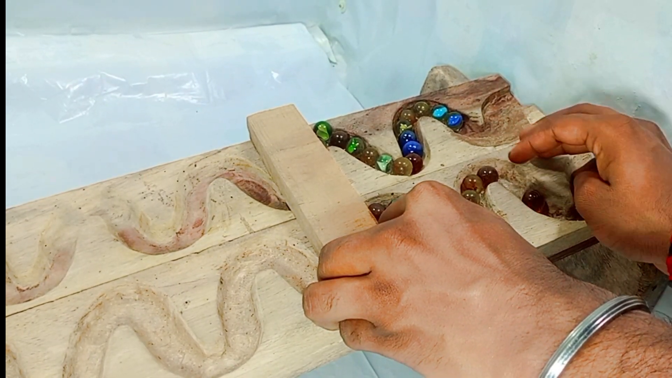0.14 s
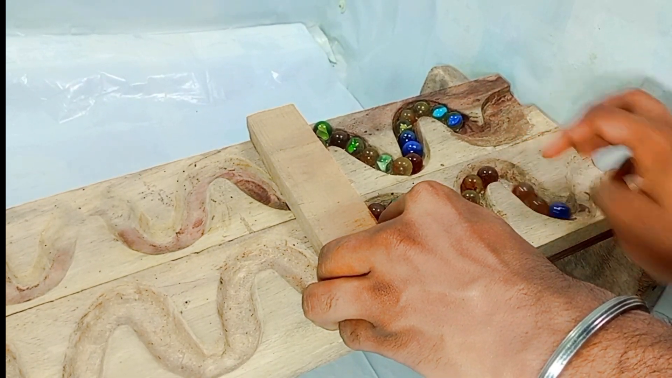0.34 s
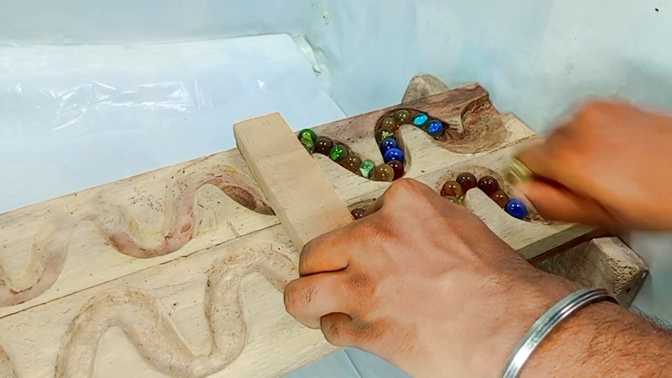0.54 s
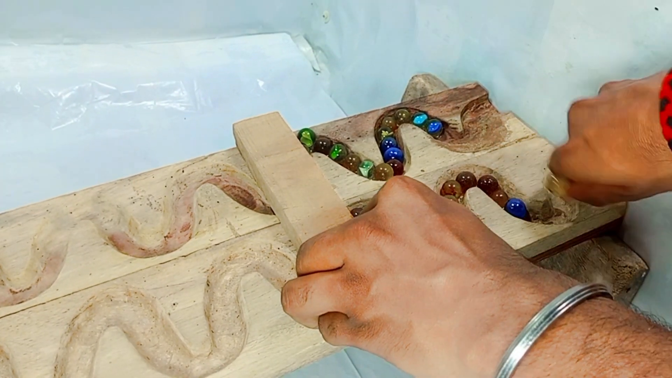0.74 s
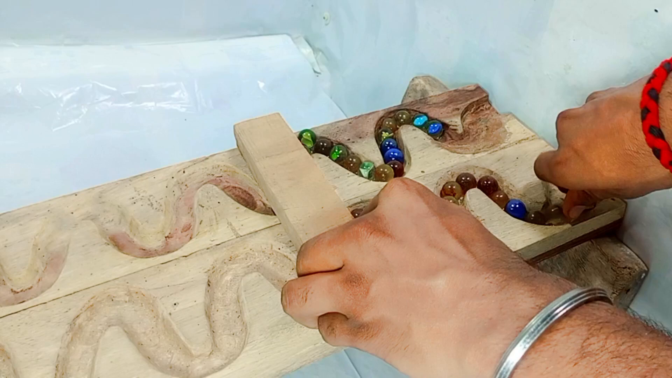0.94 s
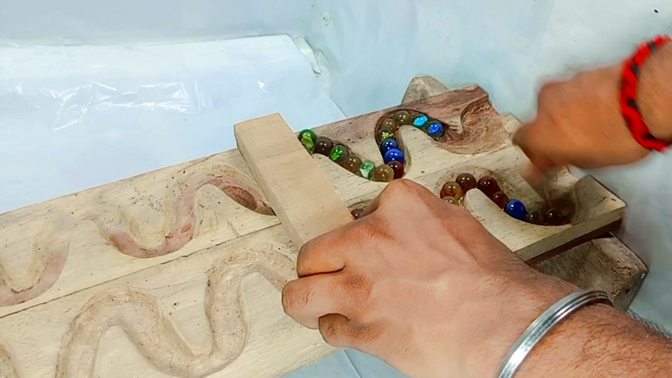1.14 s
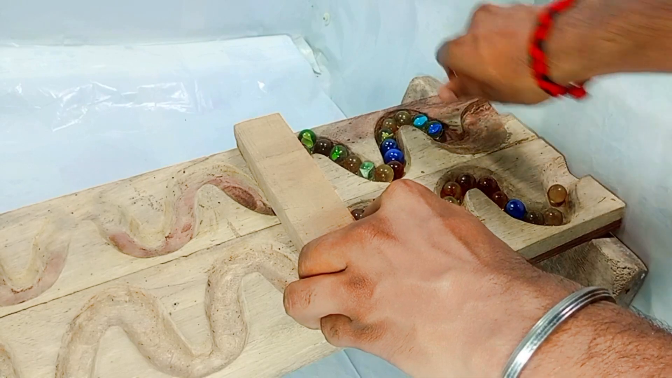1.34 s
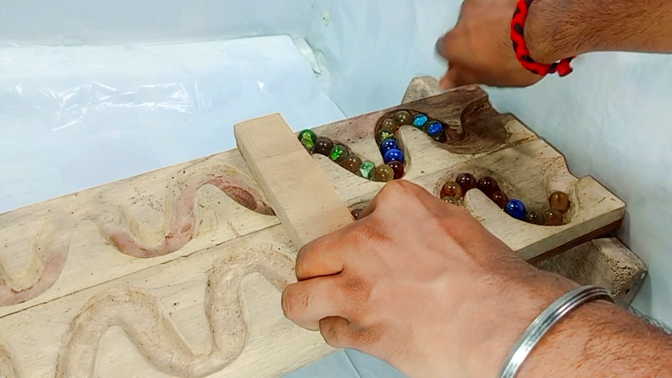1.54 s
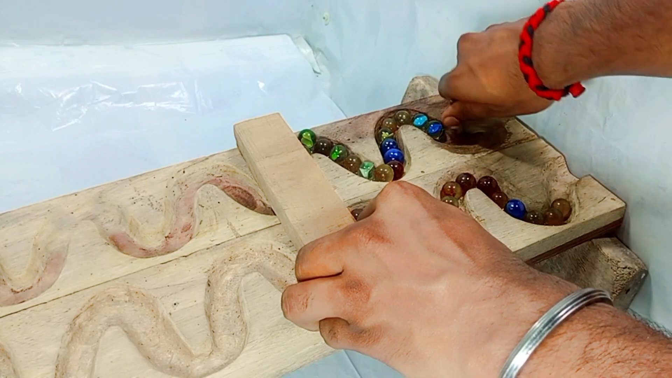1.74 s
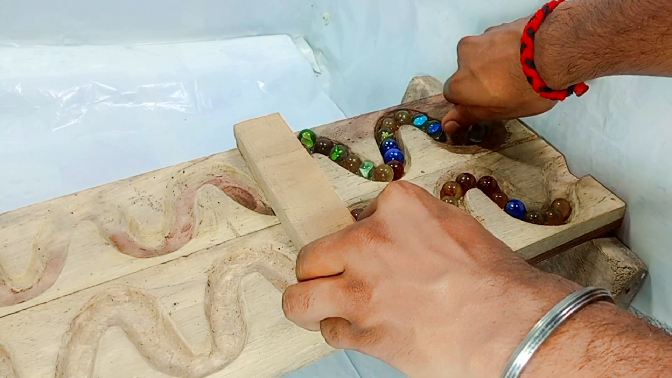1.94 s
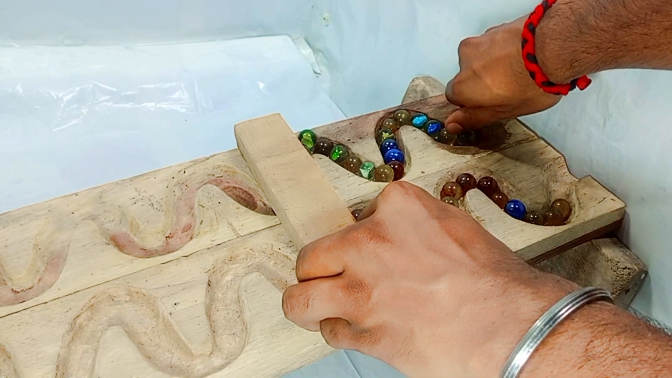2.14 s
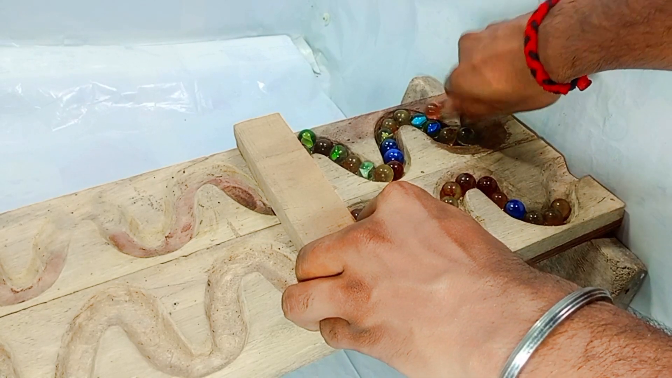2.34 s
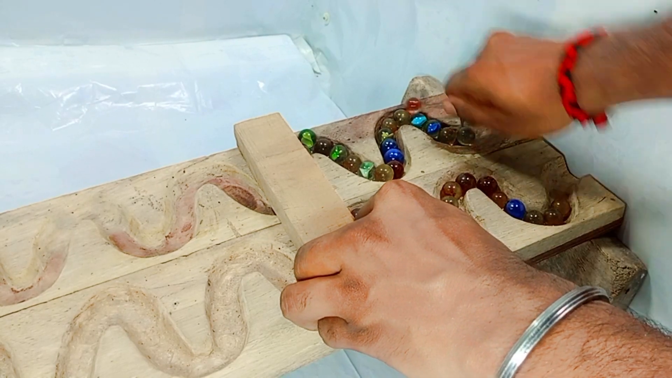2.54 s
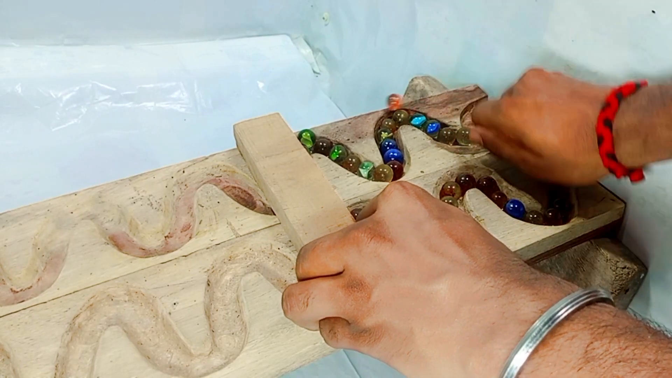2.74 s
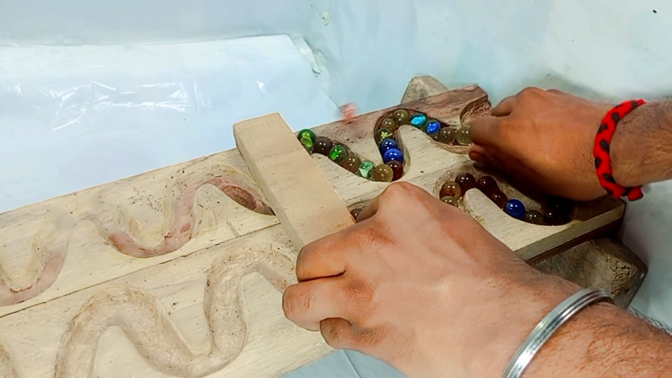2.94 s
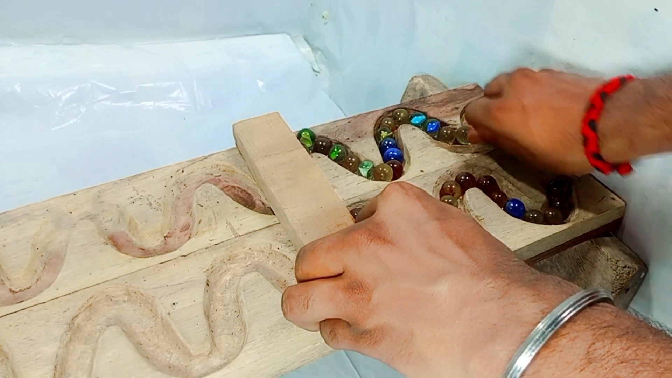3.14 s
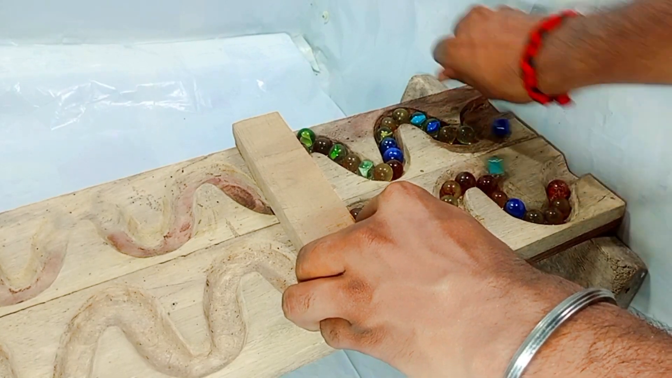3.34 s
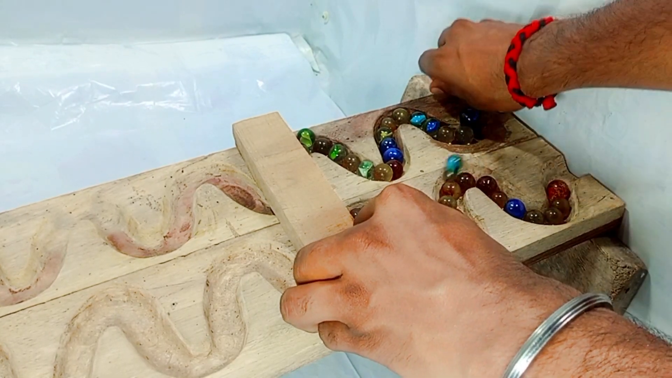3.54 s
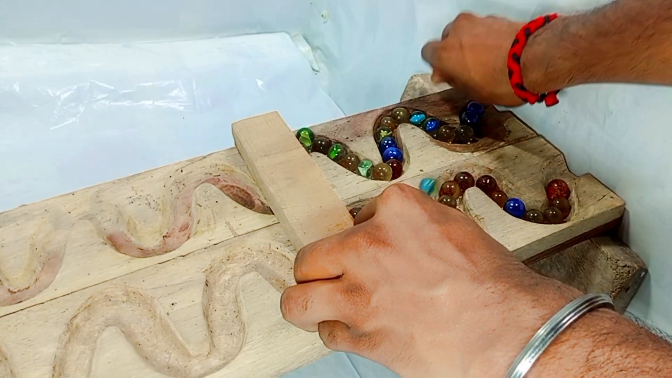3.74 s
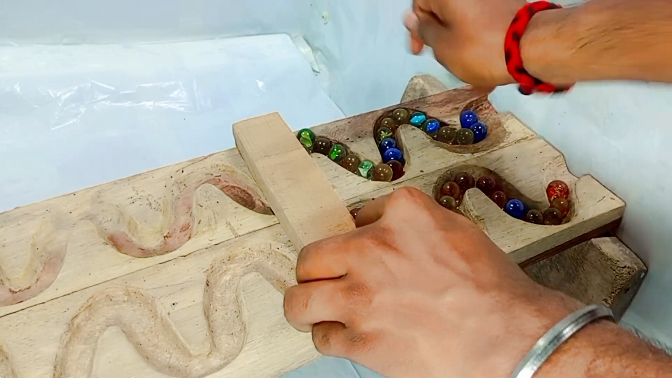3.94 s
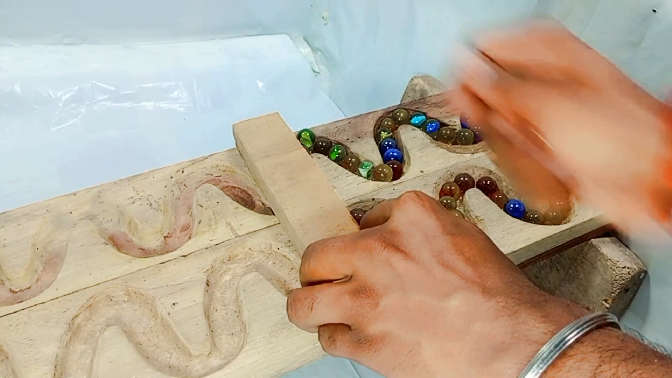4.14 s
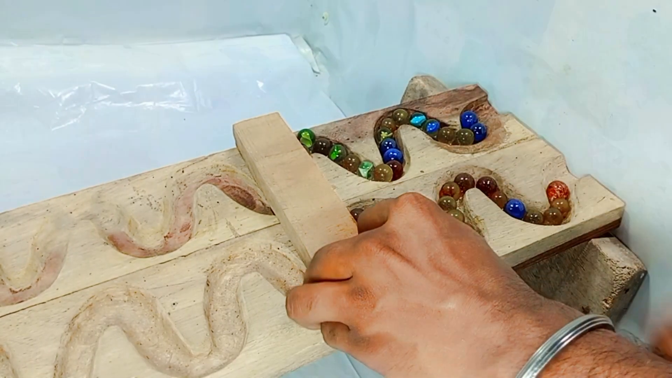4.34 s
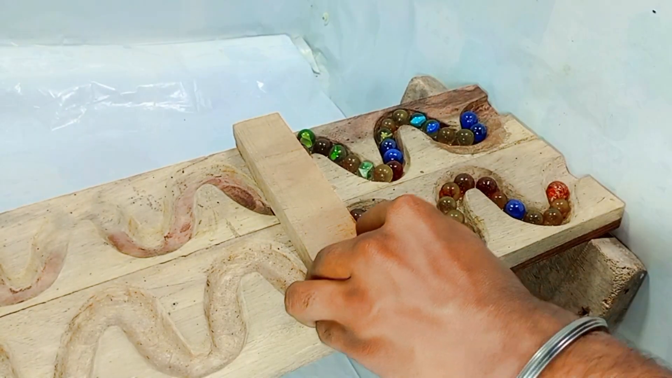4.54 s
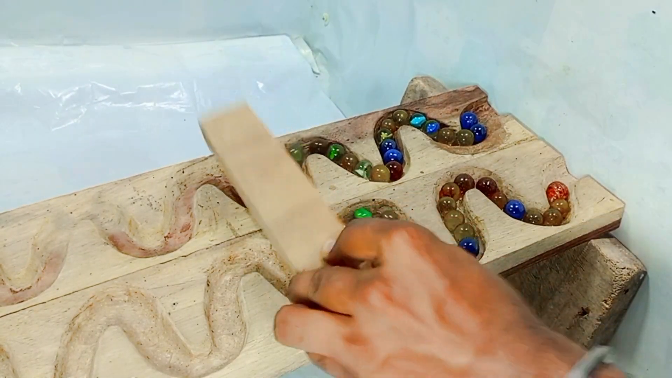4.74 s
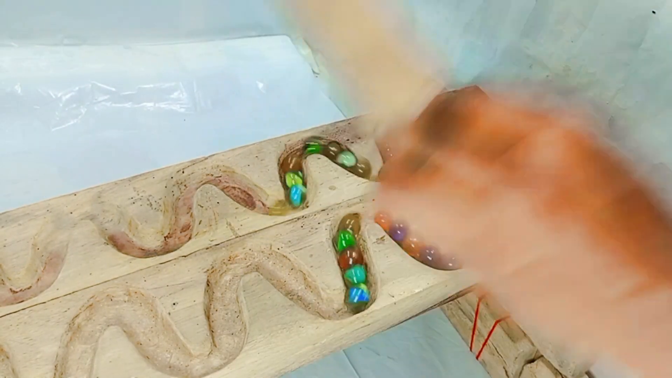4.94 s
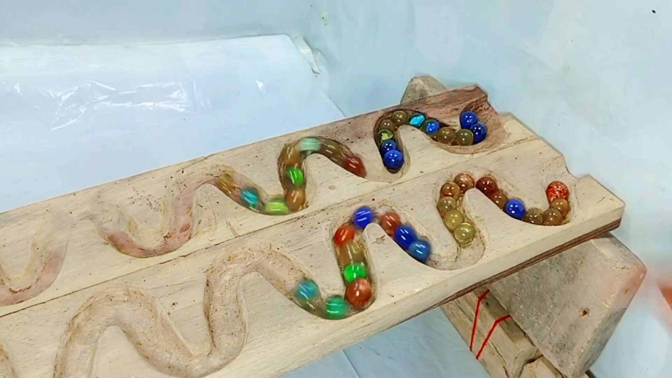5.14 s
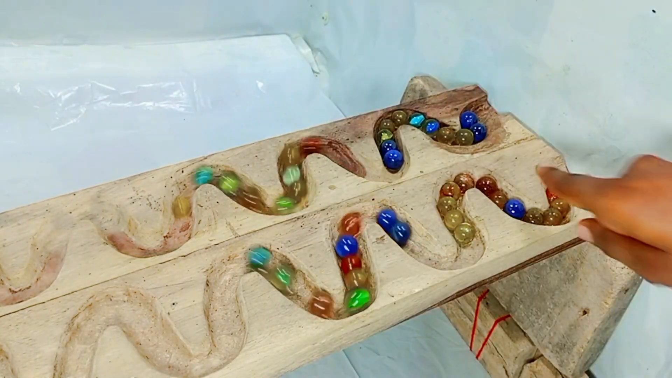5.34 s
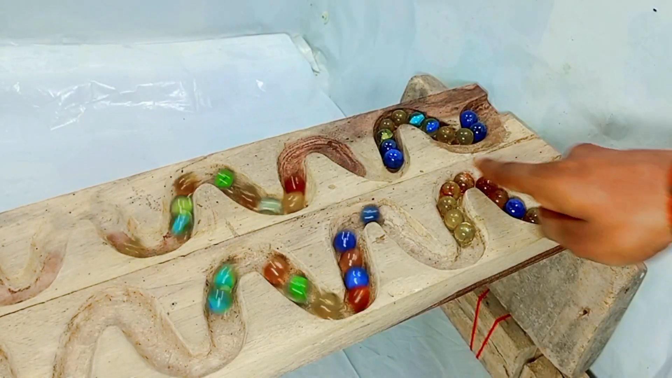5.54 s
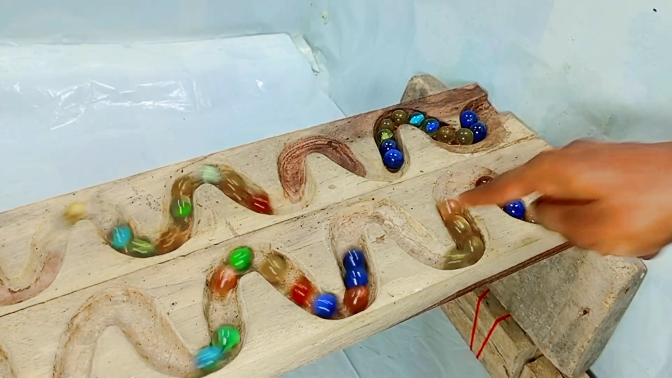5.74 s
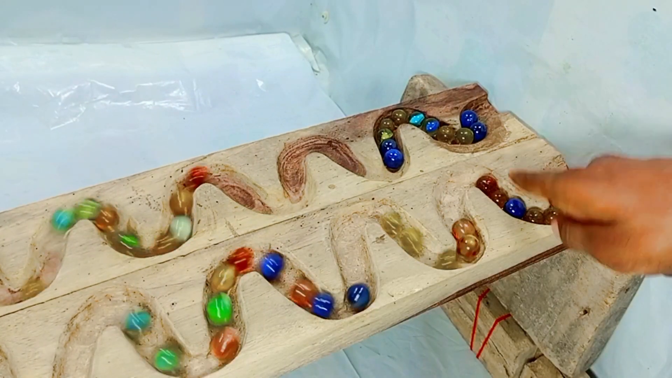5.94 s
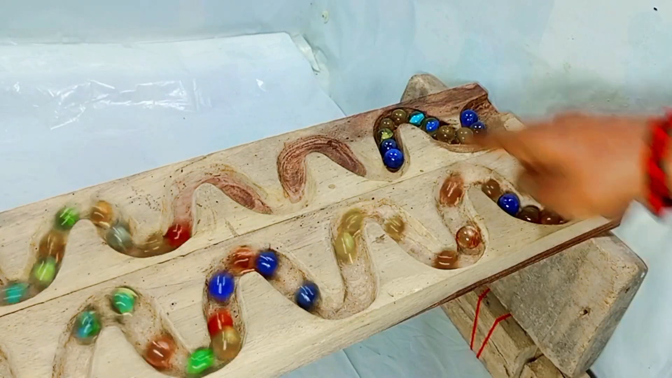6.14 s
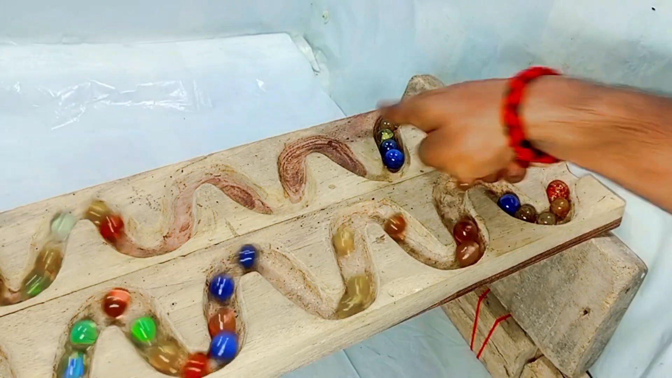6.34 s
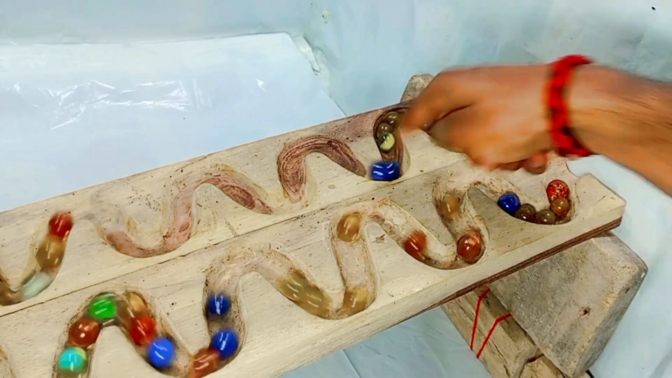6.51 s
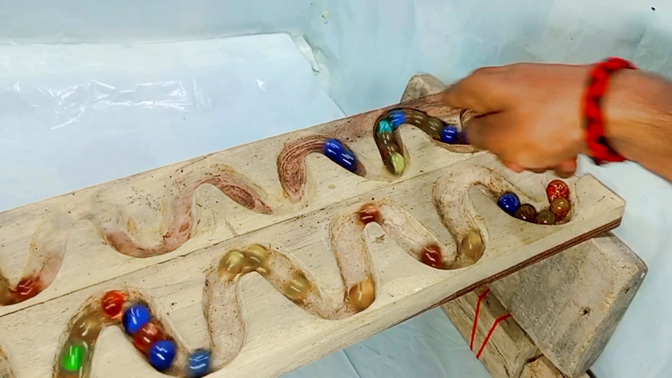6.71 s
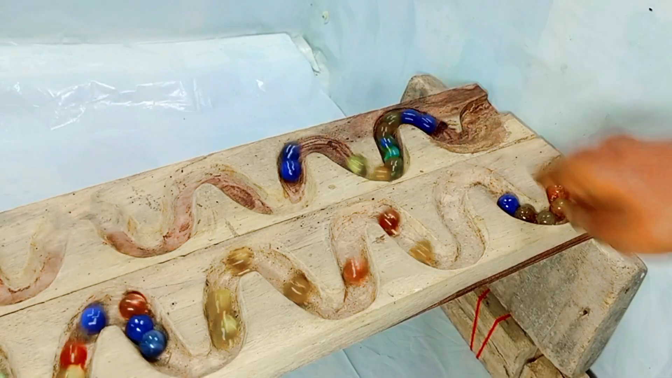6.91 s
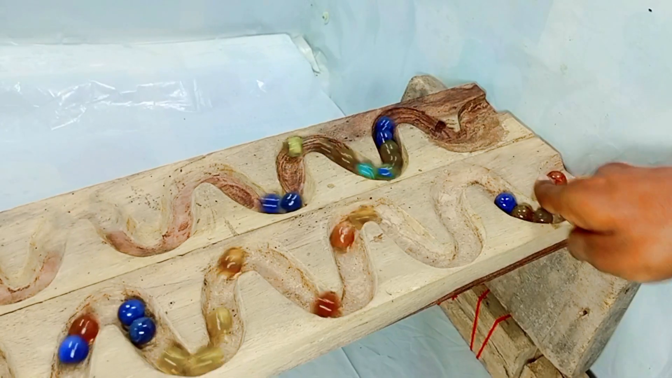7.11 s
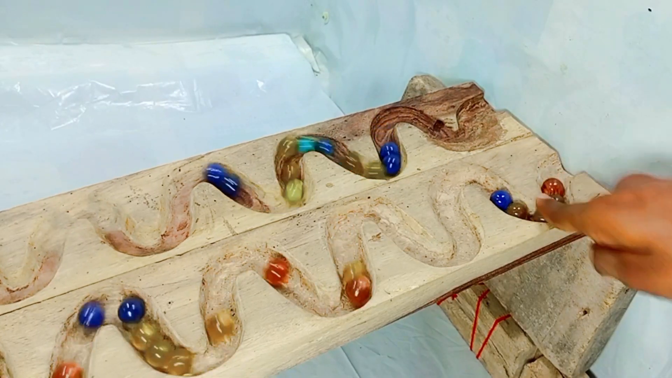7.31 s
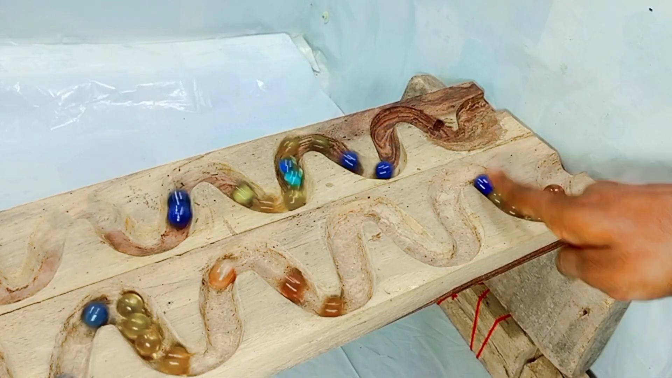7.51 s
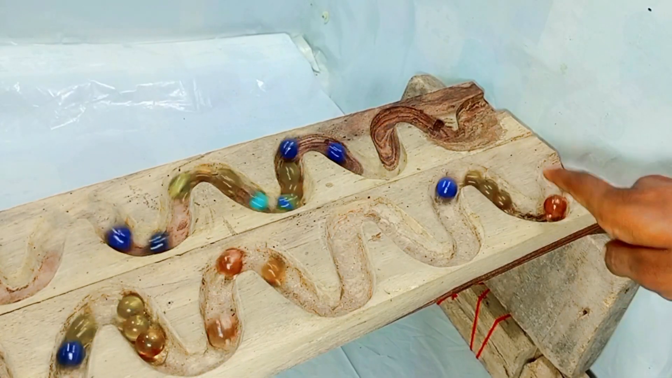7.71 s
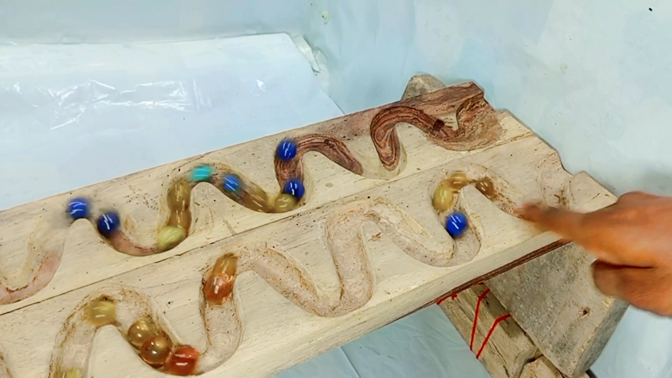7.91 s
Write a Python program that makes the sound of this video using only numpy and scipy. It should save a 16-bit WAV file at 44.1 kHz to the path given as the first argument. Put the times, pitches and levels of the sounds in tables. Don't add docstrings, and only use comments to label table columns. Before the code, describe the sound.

Handfuls of marbles land on a thin wooden board in uneven clusters, sharp taps, fast little bounces and crisp clicks, with the pauses dropping almost to silence. Just before five seconds a block lifts with hard knocks; a dense woody rolling rumble swells, busy with bumps and glass ticks, then turns into a hollow clatter of falling marbles that continues to the end. Close phone microphone, short room reflections.

```python
import sys
import numpy as np
from scipy import signal
from scipy.fft import rfft, irfft, next_fast_len
from scipy.io import wavfile

SR = 44100
rng = np.random.default_rng(int(sys.argv[2]) if len(sys.argv) > 2 else 0)


def transcribe(u):
    v = np.clip(np.atleast_2d(u).T, -1, 1)
    q = np.round(v * 32767).astype(np.int16)
    wavfile.write(sys.argv[1], SR, q)


def elevation(decibels):
    levels = np.asarray(decibels, float)
    return 10 ** (levels / 20)


N = 351477


def rms_one(x):
    return x / np.sqrt(np.mean(x ** 2) + 1e-20)


def at_hz(points, hz):
    points = np.array(points)
    return np.interp(np.log(hz + 1), np.log(points[:, 0]), points[:, 1])


def colour(x, spectrum):
    size = next_fast_len(N)
    gain = elevation(at_hz(spectrum, np.fft.rfftfreq(size, 1 / SR)))
    return irfft(rfft(x, size) * gain, size)[:N]


def band(x, low_hz, high_hz):
    return signal.sosfilt(signal.butter(2, [low_hz, high_hz], "band", fs=SR, output="sos"), x + 1e-18)


def ring(clicks, hz, t60):
    r = elevation(-60 / (t60 * SR))
    w = 2 * np.pi * hz / SR
    return signal.lfilter([0, np.sin(w)], [1, -2 * r * np.cos(w), r * r], clicks + 1e-18)


def fade(x, t60):
    return signal.lfilter([1], [1, -elevation(-60 / (t60 * SR))], x + 1e-18)


def grains(per_s, spread_db):
    sizes = elevation(spread_db * np.minimum(rng.exponential(1, N), 5)) * rng.choice([-1, 1], N)
    return sizes * (rng.random(N) < per_s / SR)


def wood(x, soft_hz):
    x = signal.sosfilt(signal.butter(5, soft_hz, fs=SR, output="sos"), x)
    return signal.sosfilt(signal.butter(4, 320, "high", fs=SR, output="sos"), x)


def strike(events, modes, pivot_hz, level_db, scatter_db, rattle_s):
    rebound = 0.35
    s, peak_db, dull_db = np.transpose(events)
    luck = rng.standard_normal((len(s), len(modes), 3))
    late = rattle_s * rng.random((len(s), 2))
    out = np.zeros(N)
    for k, (hz, mode_db, t60) in enumerate(modes):
        tilt_db = dull_db * np.clip(np.log2(pivot_hz / hz), -1, 1.2)
        height = elevation(peak_db + level_db + mode_db + tilt_db + scatter_db * luck[:, k, 0])
        clicks = np.zeros(N + SR)
        np.add.at(clicks, (s * SR).astype(int), height * (-1) ** k)
        for j in range(2):
            rattle_at = ((s + late[:, j]) * SR).astype(int)
            np.add.at(clicks, rattle_at, rebound * height * np.sign(luck[:, k, j + 1]))
        out += ring(clicks[:N], hz, t60)
    return out


def glass(events, body_db, sparkle_db):
    s, peak_db, top_db = np.transpose(events)
    at = (s * SR).astype(int)
    body, top = np.zeros(N), np.zeros(N)
    body[at] = elevation(peak_db + body_db)
    top[at] = elevation(peak_db + top_db + sparkle_db)
    crack = fade(body, 0.03) * rng.standard_normal(N)
    sparkle = fade(top, 0.015) * rng.standard_normal(N)
    crack = band(band(crack, 3600, 9000), 5000, 6590)
    return crack + band(band(sparkle, 7300, 15500), 8300, 16000)


# frequency in Hz, level in dB.
HUSH = [(18, -44.5), (30, -8.5), (157, -3.5), (227, -5), (280, -2), (328, -9), (1350, -4.5), (16000, -41)]


def room_hush():
    return elevation(-89) * rms_one(colour(rng.standard_normal(N), HUSH))


# frequency in Hz, level in dB, t60 in seconds.
BOARD_MODES = [(200, -56.5, .08), (335, -60.5, 0.049), (450, -29.5, .06), (615.4, -14.5, 0.092),
               (713, -9, 0.02), (936, -6.5, 0.02), (1047, -17, 0.12), (1328, 2.5, 0.022), (1706, -16, 0.09),
               (1921.4, 3.5, 0.015), (2030, 3, 0.012), (2362, -7.5, 0.022), (2650, 4, 0.018),
               (2894, -3.5, 0.011), (3232, -9.5, 0.013), (3707, -5, 0.013), (4250, -22, .02),
               (4690, -25.5, 0.034)]
# frequency in Hz, level in dB, t60 in seconds.
TRAY_MODES = [(500, -19.5, .03), (774.5, -4.5, 0.028), (935, -4.5, .02), (1186, -3, 0.01),
              (1466, 1.5, 0.011), (1703, -0.5, 0.013), (2013, -5.5, 0.014), (2615, -5.5, .010),
              (3180, -9.5, .008), (3953, -15.5, 0.0069)]
# frequency in Hz, level in dB per Hz.
RUMBLE_SPECTRUM = [(140, -47.5), (240, -18.5), (300, -11), (329, -11), (387, -4), (477, -7.5), (710, 1.5),
                   (974, -7.5), (1200, 0.5), (1560, -23.5), (2640, -120)]
# frequency in Hz, level in dB per Hz.
GRIT_SPECTRUM = [(410, -31.5), (700, -4.5), (766, -10.5), (1630, -4.5), (3490, -14), (5360, -30),
                 (6340, -23), (10100, -54), (15500, -60)]
# from and until, in seconds.
TRAY_FILLS_S = (6.5, 7.12)
# time in seconds, then levels in dB of the ring of the
ROLL_LEVELS = [(0, -40, -41, -85, -78), (0.071, -64, -57, -89.5, -79), (0.2, -39, -46.5, -83.5, -90),
               (0.36, -52.5, -47.5, -78, -90), (0.41, -75, -62, -102, -99), (0.46, -72, -93, -86, -95),
               (0.52, -58, -93, -74, -92), (0.65, -55, -64, -71, -78), (0.8, -73, -85, -69, -75),
               (0.9, -39, -41, -61, -62), (1.05, -46, -45, -82, -74), (1.13, -58, -66, -93.5, -92),
               (1.2, -52, -50, -58, -88), (1.27, -53, -56, -58, -83), (1.338, -39, -34.5, -50.5, -43),
               (1.4, -54.5, -56, -68, -66), (1.47, -66, -65, -88, -78), (1.63, -77, -93, -96, -89),
               (1.67, -47, -59, -65, -94), (1.72, -87, -56, -97, -85), (1.9, -45, -34.5, -70, -73),
               (2.05, -63, -57, -87, -87), (2.11, -96, -77, -82, -92), (2.25, -47.5, -47, -105, -92),
               (2.42, -63, -71, -74, -94), (2.48, -72, -58, -60, -58), (2.6, -51, -40, -50, -61),
               (2.678, -72, -57, -60, -99), (2.74, -67, -78, -104, -83), (2.78, -66, -78, -71.5, -72),
               (2.9, -42, -52, -68.5, -69), (3.03, -46.5, -39, -77.5, -69), (3.1, -61, -78, -92, -77),
               (3.18, -51, -36, -58, -61), (3.3, -51.5, -41.5, -81, -78), (3.42, -41, -34, -55, -71),
               (3.52, -62, -54, -71.5, -77), (3.618, -46, -38, -64, -92), (3.72, -52, -60.5, -89, -89),
               (3.85, -50, -43.5, -63, -82), (3.92, -59, -55.5, -90, -83), (4.05, -41, -50, -69, -86),
               (4.13, -62, -86.5, -90, -93), (4.25, -89.5, -85, -99, -97), (4.58, -83, -87, -103, -84),
               (4.659, -47.5, -47.5, -85.5, -94), (4.75, -40.5, -37.5, -58, -63),
               (4.9, -43.5, -55, -68, -65), (5.098, -32, -35, -78, -85), (5.3, -30.5, -36.5, -82, -70),
               (5.501, -27.5, -33, -59, -57.5), (5.75, -26.5, -33, -60, -56.5), (6, -26, -32, -64, -59.5),
               (6.3, -25.5, -32, -53, -49.5), (6.6, -23.5, -32.5, -55.5, -62.5),
               (6.85, -25.5, -33.5, -50, -57.5), (7.1, -28, -30, -47, -58), (7.4, -28, -36, -51.5, -55),
               (7.7, -26.5, -30, -51.5, -60), (7.97, -29, -39.5, -53, -48)]


def rolling():
    s, ring_db, rumble_db, grit_db, thud_db = np.transpose(ROLL_LEVELS)
    t = np.arange(N) / SR

    jolts = grains(400, spread_db=2.8)
    board = np.zeros(N)
    for hz, db, t60 in BOARD_MODES:
        if hz > 1000:
            contacts = jolts * rng.standard_normal(N) + 0.4 * grains(800, spread_db=3.5)
            board += elevation(db) * ring(contacts, hz, 1.9 * t60)

    tumbling = grains(900, spread_db=3.0)
    tray = np.zeros(N)
    for k, (hz, db, t60) in enumerate(TRAY_MODES):
        tray += elevation(db) * (-1) ** k * ring(tumbling, hz, t60)

    share = np.interp(t, TRAY_FILLS_S, [0, 0.85])
    tone = np.sqrt(1 - share) * rms_one(board) + np.sqrt(share) * rms_one(tray)
    tone = rms_one(wood(tone, 4400))

    rumble = rms_one(colour(grains(1500, spread_db=1.5), RUMBLE_SPECTRUM))

    patches = fade(np.abs(grains(120, spread_db=4.5)) + 0.00027, 0.047)
    grit = colour(patches * rng.standard_normal(N), GRIT_SPECTRUM)
    grit /= np.std(band(grit, 4590, 11000))

    thud = rms_one(band(band(rng.standard_normal(N), 60, 300), 100, 260))

    layers = [(tone, ring_db), (rumble, rumble_db), (grit, grit_db + 1.5), (thud, thud_db)]
    return sum(elevation(np.interp(t, s, db)) * x for x, db in layers)


# start in seconds, peak in dB,
# dullness in dB per octave down.
KNOCKS = [(0.087, -5.5, -4), (0.1172, -8, -2.5), (0.1392, -8, -6.5), (0.174, -16, 0.5), (0.2185, -24.5, 4),
          (0.2335, -15, -2), (0.2643, -22, -2.5), (0.2763, -25, 3), (0.305, -18.5, -2), (0.4447, -49, -11),
          (0.4822, -36.5, -11), (0.5074, -34, -13.5), (0.5686, -37, -7), (0.61, -37, -6),
          (0.6734, -24, -7.5), (0.714, -27.5, -2), (0.7477, -28, 0), (0.7477, -31, -2), (0.7602, -22, -4.5),
          (0.8441, -7, -2.5), (0.8525, -8, -3), (0.8949, -12.5, -3.5), (0.913, -8, -4.5), (0.9283, -2.5, 1),
          (0.9534, -13, 2), (0.9812, -12, -3.5), (1.0217, -17, -1), (1.0455, -21, -2), (1.1496, -24.5, -5),
          (1.1619, -8, -3.5), (1.2355, -17, -1), (1.2755, -20.5, -7.5), (1.299, -24, -3), (1.3188, -19, -3),
          (1.6572, -35.5, 5), (1.716, -34, -9), (1.743, -4.5, 2.5), (1.7753, -7, -1.5), (1.8299, -5, -0.5),
          (1.8563, -3, 0.5), (1.8891, -24, -4), (1.923, -14, 2.5), (1.943, -24, 0), (2.0073, -26, 5),
          (2.051, -27.5, 6), (2.1313, -12, 1), (2.1476, -9, 2.5), (2.1839, -11, 1), (2.2119, -19, -1.5),
          (2.236, -19.5, -2.5), (2.2722, -28, 8.5), (2.352, -26.5, 5.5), (2.4404, -36.5, -7),
          (2.4646, -30.5, 3), (2.4812, -19, 1), (2.4995, -14, 1), (2.5351, -34, 0), (2.5497, -17.5, -1.5),
          (2.598, -34, 3), (2.615, -37, -15), (2.766, -28.5, 3.5), (2.8135, -53, -0.5), (2.828, -29, -0.5),
          (2.8392, -3, -0.5), (2.8693, -16, -3), (2.8783, -5, 0), (2.9018, -15, 0.5), (2.9407, -55, 1),
          (2.9398, -9.5, -1), (2.9681, -16.5, -2.5), (3.0033, -15.5, -1), (3.1369, -28, -2),
          (3.1647, -4.5, 4), (3.2024, -21.5, -1), (3.224, -10, 7), (3.264, -11, 6.5), (3.3337, -12, -2.5),
          (3.3817, -9.5, 3.5), (3.4083, -25.5, -2), (3.4306, -13, 5.5), (3.49, -24.5, -4.5),
          (3.492, -34, -3.5), (3.5418, -2.5, -1.5), (3.6734, -21, -4), (3.7678, -29, 0),
          (3.8058, -30.5, 10.5), (3.8286, -15, -4), (3.937, -14, 0), (3.9807, -12.5, -3),
          (4.0425, -18.5, -11.5),
          (0.1544, -16, -1),
    (0.1894, -16, -1),
    (0.3354, -28, -1),
    (0.393, -42, -1),
    (1.3344, -25, -1),
    (3.2084, -4.5, -1),
    (3.5744, -13, -1),
    (3.6044, -20, -1),
    (3.8571, -29, -1),
          (4.165, -37, -3),
]


def dropped_marbles():
    drops = KNOCKS
    return strike(drops, BOARD_MODES, 1700, level_db=-10, scatter_db=1.5, rattle_s=0.005)


# frequency in Hz, t60 in seconds.
ROOM_DECAY = [(100, 0.083), (700, 0.21), (2500, 0.084), (6500, 0.16), (12000, .06)]


def room(x):
    t = np.arange(SR // 2) / SR
    tail = np.zeros(len(t))
    for hz in 125 * 2.0 ** np.arange(7):
        octave = band(rng.standard_normal(len(t)), hz / 1.343, hz * 1.098)
        tail += octave * elevation(-60 * t / at_hz(ROOM_DECAY, hz))
    tail *= 1 - np.exp(-t / 0.002104)
    return signal.fftconvolve(x, tail / np.sqrt(np.sum(tail ** 2)))[:N]


# start in seconds, peak in dB, sparkle in dB relative to the click.
CLICKS = [(0.0877, -44.5, -42), (0.137, -47, -28), (0.2516, -34.5, -34), (0.57, -43, -44),
          (0.6729, -38.5, -23), (0.9163, -25, -32), (0.9558, -26.5, -29.5), (1.1537, -53, -43),
          (1.1613, -22.5, -60), (1.3157, -33.5, -22), (1.654, -48, -37), (1.773, -51.5, -52),
          (1.8316, -44, -15), (1.8543, -49, -44.5), (2.0492, -34.5, -18), (2.319, -53, -31),
          (2.4797, -31, -19), (2.5534, -33.5, -25), (2.837, -50.5, -10.5), (3.0015, -33, -17),
          (3.1369, -50, -23.5), (3.204, -26, -15.5), (3.333, -34, -15.5), (3.3794, -24, -21.5),
          (3.4905, -38, -16.5), (3.543, -27, -35), (3.8292, -37.5, -15), (3.9365, -44.5, -17.5),
          (4.0421, -37, -32), (4.6947, -29, -43)]


def marble_clicks():
    return glass(CLICKS, body_db=5, sparkle_db=7.5)


# start in seconds, peak in dB, dullness in dB per octave down.
RELEASE = [
    (4.6299, -39, -1),
    (4.6867, -11, -1),
    (4.6872, -5, -1),
    (4.7581, -7.5, -1),
    (4.781, -20, -1),
    (4.802, -12, -1),
    (4.8264, -15.5, -1),
    (4.8464, -17.5, -1),
    (4.8933, -20.5, -1),
    (4.9955, -25, -1),
]


def stop_block():
    return strike(RELEASE, BOARD_MODES, 1700, level_db=-10, scatter_db=1.5, rattle_s=0.005)


# start in seconds, peak in dB, sparkle in dB relative to the click.
JOSTLES = [(5.0032, -48, -41), (5.1409, -49, -17), (5.1798, -44.5, -30), (5.2387, -37.5, -22),
           (5.3679, -39, -20), (5.4487, -57, -12), (5.4771, -41, -35), (5.5365, -63, -15),
           (5.5535, -43.5, -38), (5.6443, -64, -26), (5.7091, -43, -22), (5.7316, -41.5, -21),
           (5.8323, -47, -28), (5.8917, -46, -30.5), (6.0438, -49, -33), (6.1301, -55, -26),
           (6.1726, -44, -29), (6.2653, -36, -14.5), (6.3137, -43.5, -13), (6.3931, -68, -21),
           (6.4105, -53.5, -26), (6.5836, -42, -17.5), (6.6609, -49, -19), (6.6609, -42.5, -21),
           (6.7293, -56.5, -8), (6.7448, -45, -10), (6.7896, -47, -16.5), (6.8151, -40, -20),
           (6.9129, -52, -24.5), (6.9692, -48, -8), (7.0301, -50, -6), (7.1768, -47, -21),
           (7.1987, -40.5, -15), (7.317, -51, -18.5), (7.3788, -50, -22), (7.4422, -42, -26),
           (7.6507, -56, -20), (7.731, -32.5, -13.5), (7.8208, -49.5, -8), (7.9091, -45.5, -14.5)]


def jostling_rows():
    return glass(JOSTLES, body_db=11.5, sparkle_db=8.5)


# start in seconds, peak in dB, dullness in dB per octave down.
BUMPS = [(5.1445, -24.5, -1), (5.1724, -31, -1), (5.369, -14.5, -1), (5.5609, -11, -0.92),
         (5.603, -41, -1.16), (5.6349, -12, -1.1), (5.6613, -1, -1), (5.7626, -18, -1), (5.827, -11, -1),
         (5.9655, -22, -1), (6.014, -5.5, -1), (6.043, -17.5, -1), (6.1375, -9.5, -0.75), (6.1796, -14, -1),
         (6.2018, -14.5, -1), (6.24, -3, -0.88), (6.3478, -15, -1), (6.369, -12, -1.1), (6.4288, -10, -1),
         (6.4835, -18, -1.2), (6.5269, -22, -1), (6.5747, -5.5, -1.3), (6.6145, -8, -1),
         (6.6271, -3.5, -1.3)]


def groove_bumps():
    return strike(BUMPS, BOARD_MODES, 1900, level_db=-13.5, scatter_db=2.0, rattle_s=0.0062)


# start in seconds, peak in dB, dullness in dB per octave down.
FALLS = [(6.669, -2, -6.5), (6.7454, 0, -3), (6.7505, -5, 1), (6.8045, -2.5, -2.5), (6.8172, -11, -10),
         (6.8274, 0, -3), (6.8603, -7, -6), (6.9007, 0.5, -2), (6.9116, -9, -3), (6.971, 1.5, -5),
         (6.9778, -2.5, -2.5), (7.0299, -8.5, -4), (7.0434, -0.5, -2.5), (7.0708, -2.5, -4),
         (7.0846, -5, -3), (7.1137, -22, -3), (7.1484, 1.5, -2), (7.1702, -11, -6), (7.204, -5, -8.5),
         (7.2389, 2, -3.5), (7.2529, -0.5, -3), (7.3151, -1, -2), (7.3259, -0.5, 0.5), (7.3796, -3, 0),
         (7.3956, -5, -4.5), (7.4405, -2.5, -4), (7.4844, 1.5, -3), (7.4983, 3, 0), (7.5482, -11, -9),
         (7.6102, -9.5, -6), (7.6261, 2.5, -0.5), (7.651, 0, -2.5), (7.7044, -9, -4), (7.7323, 5, -6),
         (7.7966, -12, -8.5), (7.8344, 2, 0.5), (7.9095, -2.5, -9.5), (7.9407, -9.5, -3)]


def tray_falls():
    return strike(FALLS, TRAY_MODES, 1600, level_db=-7.5, scatter_db=1.0, rattle_s=0.0036)


def scene():
    board = dropped_marbles() + stop_block() + groove_bumps()
    blows = wood(board, 6600) + wood(tray_falls(), 7100)
    clicks = marble_clicks() + jostling_rows()
    tails = room(elevation(-12.5) * blows + elevation(-9) * clicks)
    return (blows + clicks + tails + rolling() + room_hush())[None]


def top_cut(x):
    return signal.sosfilt(signal.butter(12, 16490, fs=SR, output="sos"), x)


# from and until, in seconds.
MUTE_S = (.413, .441)


def record(dry):
    t = np.arange(N) / SR
    gate = np.where((t > MUTE_S[0]) & (t < MUTE_S[1]), elevation(-26), 1)
    rounded = 0.8 * np.tanh(dry * gate / 0.8)
    mix = signal.sosfilt(signal.butter(2, 95, "high", fs=SR, output="sos"), rounded)
    return top_cut(mix)


dry = scene()
out = record(dry)
transcribe(out)
```